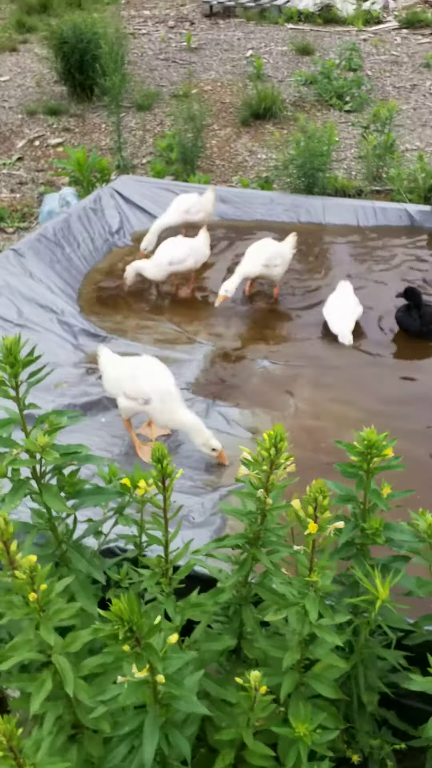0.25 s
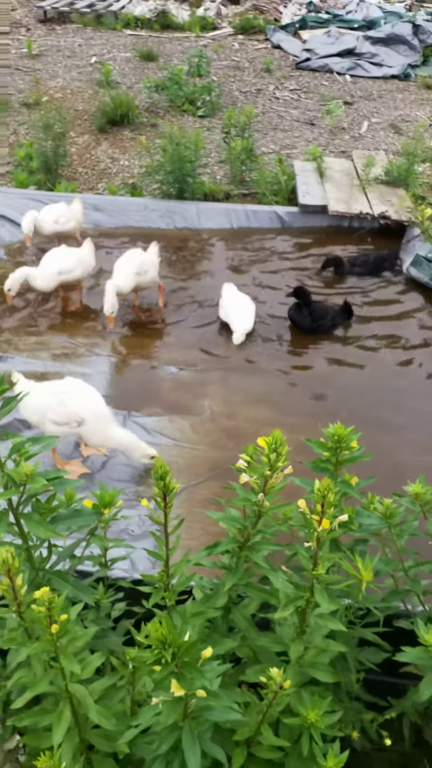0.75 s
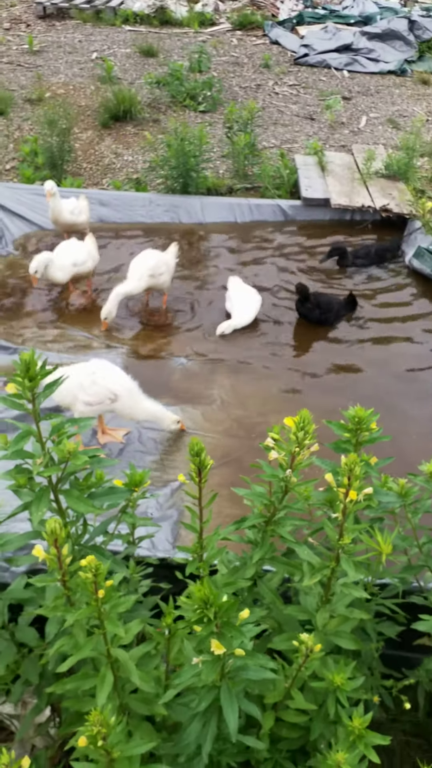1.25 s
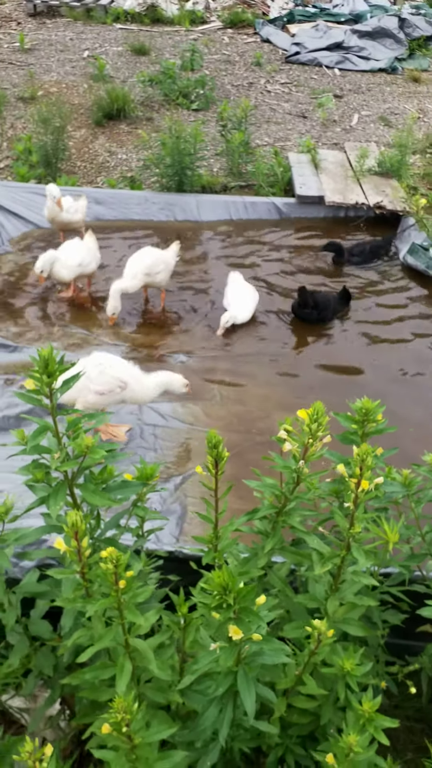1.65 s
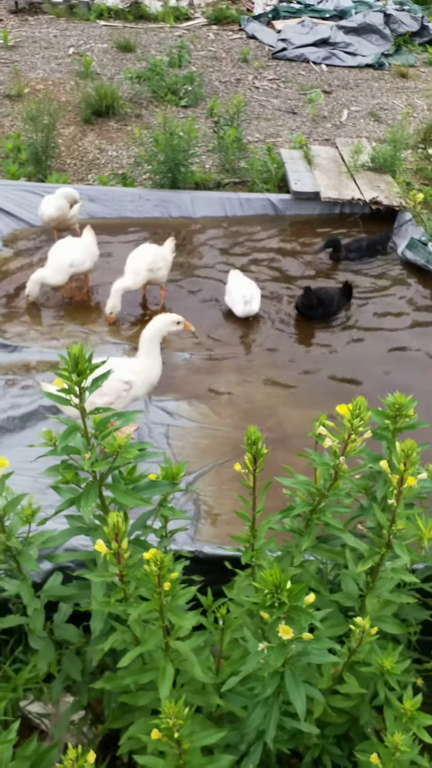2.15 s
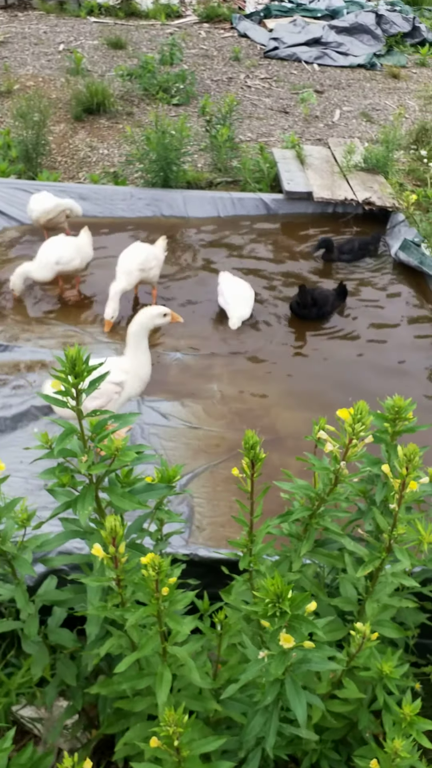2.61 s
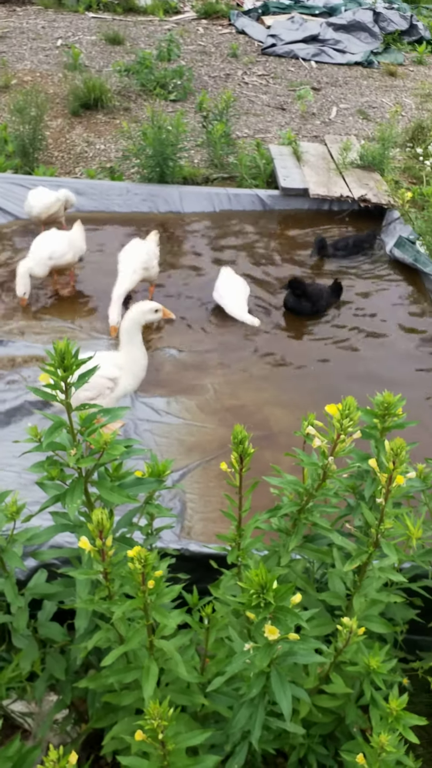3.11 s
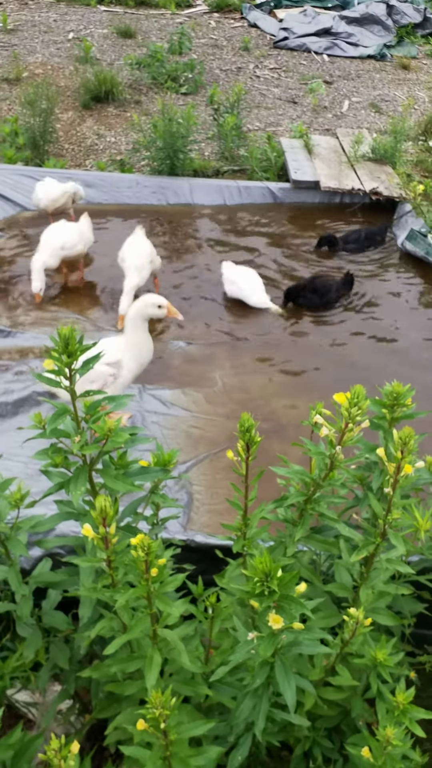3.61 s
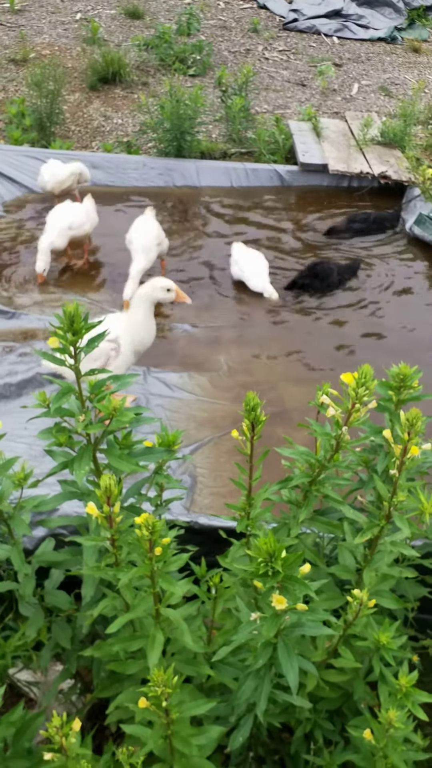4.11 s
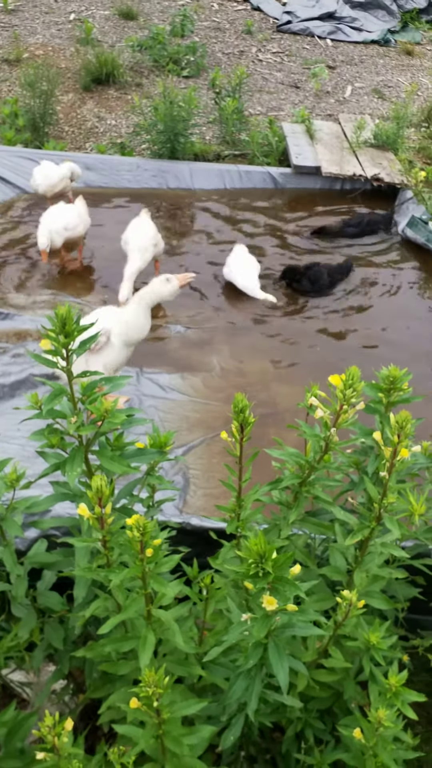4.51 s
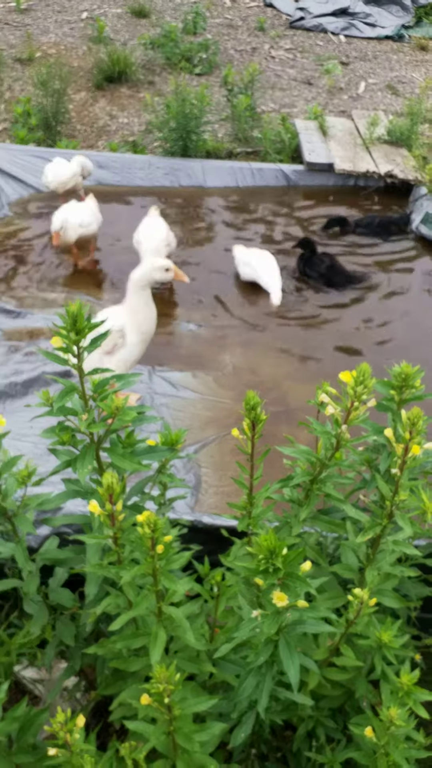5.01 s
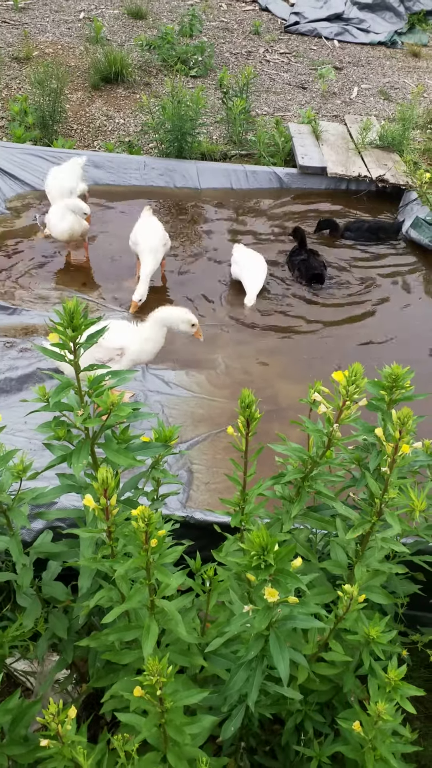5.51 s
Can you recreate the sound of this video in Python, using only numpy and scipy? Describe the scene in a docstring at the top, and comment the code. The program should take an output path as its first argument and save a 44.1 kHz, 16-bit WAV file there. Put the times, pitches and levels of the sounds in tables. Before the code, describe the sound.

One loud, cracking four-part rooster crow echoes outdoors over ticking bills, small plops and sloshes, thin peeps and brief bird whistles.

```python
"""Cockerel by a gosling pool

A cockerel crows in a yard: harmonics in a high register, hoarse low croaks between, a far wall's return.
Goslings peep in near-sine arches and a duck throat grunts in rough pulses beside a shallow pool. Bills tick,
plop and slosh as damped bubbles and noise bursts; a small bird whistles in gliding tones. Shaped noise makes
trickle, a high hiss and air, and a light wind bumps the two microphone ports."""
import sys
import numpy as np
from scipy import signal
from scipy.fft import rfft, irfft
from scipy.io import wavfile
from scipy.ndimage import uniform_filter1d

SR = 44100
rng = np.random.default_rng(int(sys.argv[2]) if len(sys.argv) > 2 else 0)


def store_pcm(level_fs):
    """Save levels as 16-bit WAV."""
    pcm = np.round(np.clip(level_fs, -1, 1) * 32767).astype(np.int16)
    wavfile.write(sys.argv[1], SR, np.atleast_2d(pcm).T)


N = 253575

# tilt between the two microphone ports: (frequency_hz, left_over_right_db)
PORT_TILT = [(60, 0), (180, -2), (550, -3.5), (1650, 4), (4970, 8), (15000, 2)]
# activity of the water, shared by trickle and droplets: (time_s, relative_level_db)
WATER_LEVEL = [(0, -59), (1.0, -61), (1.3, -63.5), (1.6, -57), (2.25, -59), (2.4, -69), (3.0, -62),
               (3.6, -66), (4.2, -67), (5.75, -67.5)]


def gain_of(db):
    """Decibels to gain."""
    return 10 ** (np.asarray(db) / 20)


def evened(x):
    """Scales to rms 1."""
    return x / np.sqrt(np.mean(x ** 2) + 1e-20)


def read(points, hz):
    """Reads a spectrum table on a log-frequency axis."""
    f, value = np.transpose(points)
    return np.interp(np.log(hz + 1), np.log(f + 1), value)


def along(curve):
    """A two-column curve at every sample."""
    return np.interp(np.arange(N) / SR, *np.transpose(curve))


def unroll(rows):
    """Sample times and every column of a curve table."""
    s, *columns = np.transpose(rows)
    t = np.arange(s[0], s[-1], 1 / SR)
    return [t] + [np.interp(t, s, c) for c in columns]


def add(mix, s, sound):
    """Mixes a sound in at a time."""
    part = mix[..., round(s * SR):][..., :sound.shape[-1]]
    part += sound[..., :part.shape[-1]]


def wobble(n, size):
    """Smooth random curve of rms 1; size is the smoothing in points."""
    return evened(uniform_filter1d(uniform_filter1d(rng.standard_normal(n), size), size))


def phase_of(hz):
    """Running phase of a pitch curve."""
    return 2 * np.pi * np.cumsum(hz) / SR


def band(x, hz, spread):
    """Band-pass around a centre; spread is the ratio of each edge to it."""
    return signal.sosfilt(signal.butter(2, [hz / spread, hz * spread], "band", fs=SR, output="sos"), x)


def pan(db):
    """Left and right gains for a level difference."""
    return gain_of([[db / 2], [-db / 2]])


def ports(x):
    """One source at two ports: a phase lead on the left and a tilt by frequency."""
    # (frequency_hz, left_lead_radians)
    port_lead = [(300, 0.067), (700, 0.44), (1420, 1.21), (2800, 0.86), (5000, 0.78)]
    hz = np.fft.rfftfreq(len(x), 1 / SR)
    half = gain_of(read(PORT_TILT, hz) / 2) * np.exp(.5j * read(port_lead, hz))
    return irfft(rfft(x) * np.array([half, 1 / half]), len(x))


def echoes(x, start_s, t60):
    """Sparse taps of random sign dying away, other taps for each port."""
    t = np.arange(SR) / SR
    signs = rng.choice([-1., 1.], (2, SR))
    sparse = rng.random((2, SR)) < .045
    taps = signs * sparse * (t > start_s) * gain_of(-60 * t / t60)
    return signal.fftconvolve(x[None], taps / np.linalg.norm(taps[0]), axes=1)[:, :N]


def bubble(hz, t60, rise):
    """A damped tone that climbs, as a bubble does near the surface; a negative rise makes it sink."""
    t = np.arange(0, t60, 1 / SR)
    tone = np.sin(2 * np.pi * hz * (t + rise * t ** 2 / t60))
    return tone * gain_of(-60 * t / t60) * np.minimum(t / 0.0005, 1)


def hiss(shape, level_db, flicker_db, alike):
    """Random short-time spectra with drifting patches and a flicker common to all bins."""
    # likeness of the two ports before scaling by alike: (frequency_hz, likeness_ratio)
    port_likeness = [(60, 0.82), (240, 1), (950, 0.88), (3770, 0), (15000, 0.36)]
    patchy_db = 2.2
    frames, hz = N // 128 + 5, np.fft.rfftfreq(512, 1 / SR)
    a, b, c, d, patches = rng.standard_normal((frames, 257, 5)).T
    patches = evened(uniform_filter1d(uniform_filter1d(patches, 5, 0), 14, 1))
    same = np.clip(alike * read(port_likeness, hz), -1, 1)[:, None]
    left, other = a + 1j * b, c + 1j * d
    z = np.array([left, same * left + np.sqrt(1 - same ** 2) * other])
    z *= gain_of(read(shape, hz)[:, None] + patchy_db * patches + flicker_db * wobble(frames, size=3))
    z *= gain_of(np.multiply.outer([.5, -.5], read(PORT_TILT, hz)))[:, :, None]
    out = signal.istft(z, nperseg=512, noverlap=384)[1][:, :N]
    # the level is that of the mean of both ports
    return gain_of(level_db) * out / np.sqrt(np.mean(out.mean(0) ** 2))


def air():
    """Steady background noise of the open yard."""
    # (frequency_hz, relative_density_db_per_hz)
    air_shape = [(18, -3), (36, 26.5), (106, 3), (458, -1.5), (678, 0), (1530, -38), (6630, -6.5),
                 (7750, -32), (8390, -38), (10600, -25.5), (15700, -26.5)]
    return hiss(air_shape, level_db=-61, flicker_db=1.0, alike=0.76)


def high_hiss():
    """High hiss that comes and goes, nearly unrelated at the two ports."""
    # (frequency_hz, relative_density_db_per_hz)
    high_shape = [(4120, -60), (7000, -5), (8240, -16.5), (8750, -17), (11000, -15), (12200, -11.5),
                  (13600, -24), (15700, -37)]
    # (time_s, level_db)
    high_level = [(0, -57), (.3, -61), (.36, -65), (.9, -63.5), (1.4, -61), (1.45, -73.5), (1.65, -69),
                  (1.7, -65.5), (2.25, -63.5), (2.32, -78), (2.84, -83), (2.87, -56.5), (3.08, -62),
                  (3.15, -74), (5.75, -79.5)]
    return hiss(high_shape, along(high_level), flicker_db=1.6, alike=0.16)


def trickle():
    """Flickering noise of trickling water that follows the activity of the water."""
    # (frequency_hz, relative_density_db_per_hz)
    trickle_shape = [(710, -2.5), (1200, 0.5), (6530, 1.5), (7800, -8.5), (8340, -51), (9000, -47),
                     (11700, -47), (19800, -120)]
    return hiss(trickle_shape, along(WATER_LEVEL) + 7, flicker_db=2.8, alike=0.65)


def wind():
    """Lumpy low noise, unrelated at the two ports, with single bumps as damped low tones."""
    # (frequency_hz, relative_density_db_per_hz)
    wind_shape = [(12, -35), (28, -13), (70, -1.5), (200, -19), (292, -23.5), (325, -28), (500, -44),
                  (650, -44), (1100, -120)]
    # (time_s, relative_level_db)
    gust_level = [(0, -88), (.3, -61.5), (1.8, -88), (1.92, -47.5), (2.25, -47.5), (2.5, -59.5),
                  (2.8, -101), (3.25, -62.5), (3.6, -71), (3.72, -45), (3.95, -53.5), (4.25, -49.5),
                  (4.45, -56), (4.9, -54.5), (5.1, -63.5), (5.75, -65)]
    # bumps on the ports: (start_s, nominal_peak_db, pitch_hz)
    bumps = [(0.111, -32, 122), (0.143, -31, 111), (0.178, -31, 230), (1.731, -39, 162), (2.238, -33, 72),
             (3.697, -34.5, 97.5), (3.724, -32, 111), (4.233, -35.5, 83), (4.363, -33.5, 100),
             (4.723, -26.5, 179.6)]
    hz = np.fft.rfftfreq(N, 1 / SR)
    low = irfft(rfft(rng.standard_normal((2, N))) * gain_of(read(wind_shape, hz)), N)
    lumpy = evened(low * gain_of(5.67 * wobble(N, size=1200)))
    out = lumpy * gain_of(along(gust_level) + 1.0) * pan(-9.5)
    for s, peak_db, hz in bumps:
        # half a period of smoothing softens the start
        soften = np.hanning(round(SR / hz / 2)) * 4 * hz / SR
        bump = signal.lfilter(soften, 1, bubble(hz, 9.7 / hz, -0.018))
        add(out, s, gain_of(peak_db) * pan(-2.0) * bump)
    return out


def bird():
    """Small bird: gliding whistles that ring on among the trees."""
    # whistles and two endings for the slide: (time_at_pace_1_s, pitch_hz, relative_level_db)
    SLIDE = [(0, 4960, -39), (0.081, 2835, -48)]
    CLIMB = [(0, 2950, -61.5), (.05, 4196, -43.5), (.066, 4800, -53.5), (.074, 5540, -52),
             (.108, 5555, -50), (.116, 5000, -51.5), (.135, 4140, -44)]
    LOOP = [(0, 2756, -52), (.02, 3750, -54), (0.036, 4250, -57), (.06, 3600, -55), (.08, 3450, -47),
            (.11, 2320, -62), (.155, 2566, -59)]
    DIP = [(0, 3030, -43.5), (0.059, 2204, -57), (0.086, 3216, -52), (.12, 3218, -46.5),
           (0.164, 2865, -47.5)]
    HOOK_UP = [(.125, 3480, -44)]
    HOOK_DOWN = [(0.093, 2640, -46)]
    # (start_s, whistle, pace_ratio, relative_level_db)
    song = [(1.569, SLIDE + HOOK_UP, 1.15, -3.5), (1.724, SLIDE + HOOK_DOWN, 1.08, -3),
            (2.854, CLIMB, 1.04, 1), (3.027, CLIMB, 1, 4), (3.997, LOOP, 1.01, 0.8),
            (4.213, DIP, 1.03, -2.6)]
    out = np.zeros(N)
    for start, whistle, pace, gain_db in song:
        t, hz, level_db = unroll(np.array(whistle) / [pace, 1, 1])
        tone = np.sin(phase_of(uniform_filter1d(hz, size=400))) * (1 + 0.45 * wobble(len(t), size=110))
        tone *= signal.windows.tukey(len(t), .15)
        add(out, start, np.sqrt(2) * gain_of(level_db + gain_db) * tone)
    return gain_of(-2.5) * ports(out) + gain_of(-2) * echoes(out, 0.0037, 0.66)


def plops():
    """Bubbles and plops in the pool: a damped tone with a splat of noise."""
    # (start_s, nominal_peak_db, pitch_hz, left_over_right_db)
    plop_rows = [(0.022, -27, 2900, -6.5), (0.172, -27.5, 2900, -4), (0.247, -30.5, 2280, -3),
                 (0.328, -25, 2670, 3), (2.741, -41.5, 606, -8), (2.741, -40.5, 1470, -17),
                 (2.857, -42, 590, 0), (3.364, -36, 806, 8), (4.93, -37.5, 1970, 8), (3.185, -33, 1290, 6),
                 (3.207, -24, 1238, 6), (3.693, -33, 3100, 5), (5.012, -37.5, 1260, 3),
                 (5.476, -34.5, 815, 2)]
    out, t = np.zeros((2, N)), np.arange(900) / SR
    for s, peak_db, hz, side_db in plop_rows:
        splat = evened(band(rng.standard_normal(900), 1020, 2.6)) * gain_of(-60 * t / 0.088)
        add(out, s, gain_of(peak_db) * pan(side_db) * bubble(hz, 0.0058 + 25 / hz, 0.012))
        add(out, s, gain_of(peak_db - 15.5) * pan(side_db) * splat)
    return out


def ticks():
    """Bills and droplets ticking: noise bursts of a few milliseconds in a band."""
    # (start_s, nominal_peak_db, centre_hz)
    tick_rows = [(0.1522, -30, 3150), (0.3034, -34.5, 4440), (0.9963, -28, 3700), (1.026, -26, 3850),
                 (1.3914, -27, 5700), (1.4534, -30, 5560), (1.5778, -23, 4750), (1.6991, -28, 4360),
                 (1.723, -28, 5140), (2.1965, -30.5, 5230), (2.357, -35.5, 5300), (2.4179, -36.5, 4270),
                 (2.564, -41, 6400), (2.8567, -37, 6420), (2.8956, -31, 4530), (3.157, -29.5, 5560),
                 (3.207, -24, 5400), (3.511, -41, 2000), (3.7363, -33.5, 5000), (3.8838, -32.5, 6250),
                 (4.085, -42, 5940), (4.141, -43, 5400), (4.211, -38, 5000), (4.3587, -32.5, 6700),
                 (4.389, -42, 6240), (5.163, -33.5, 680), (5.2352, -29.5, 4600), (5.305, -37, 4800),
                 (5.311, -35.5, 1680), (5.368, -35, 1210), (5.445, -42, 4100), (5.494, -34, 1280)]
    # high ticks are narrower: (centre_hz, band_edge_ratio)
    tick_spread = [(1500, 1.7), (4500, 1.4), (6000, 1.1)]
    out, t = np.zeros((2, N)), np.arange(900) / SR
    for s, peak_db, hz in tick_rows:
        burst = rng.standard_normal(900) * gain_of(-60 * t / .005)
        crack = band(burst, hz, read(tick_spread, hz))
        crack = crack / abs(crack).max() * [[1], [.9]]
        add(out, s, gain_of(peak_db) * pan(read(PORT_TILT, hz)) * crack)
    return out


def sloshes():
    """Water sloshing: lumpy band noise full of small rising bubbles."""
    # (middle_s, half_length_s, level_db, centre_hz)
    slosh_rows = [(.06, 0.063, -44, 776), (0.166, 0.065, -46.5, 335), (2.871, 0.037, -62, 573),
                  (3.304, 0.014, -48.5, 665), (3.457, 0.099, -49, 840), (3.767, 0.072, -56, 860),
                  (3.905, 0.03, -50, 797), (5.167, 0.042, -46, 740), (5.274, 0.041, -53, 830),
                  (5.488, 0.021, -50.5, 780), (5.577, 0.035, -52.5, 720), (5.724, 0.026, -46.5, 890)]
    out = np.zeros((2, N))
    for s, half, level_db, hz in slosh_rows:
        n = round(4 * half * SR)
        churn = band(rng.standard_normal((2, n)) * [[1], [.6]], hz, 1.58)
        churn *= gain_of(1.08 * wobble(n, size=220))
        for share in (.7, .9, 1.15, 1.5):
            # about 90 bubbles a second at each pitch
            strikes = rng.exponential(.3, n) * (rng.random(n) < 90 / SR)
            churn += signal.oaconvolve(strikes, bubble(hz * share, 14 / hz, .2))[:n]
        slosh = evened(churn + 0.17 * churn[0]) * np.hanning(n)
        add(out, max(s - 2 * half, 0), gain_of(level_db) * slosh)
    return out


def droplets():
    """A random patter of tiny bubbles over twelve pitches."""
    out = np.zeros((2, N))
    for hz in np.geomspace(3000, 6900, num=12):
        size_db = along(WATER_LEVEL) + 19 + 4. * np.minimum(rng.exponential(1, N), 4)
        # small droplets fall more often
        falls = rng.random(N) < 1.6 / SR * hz / 1000
        patter = signal.oaconvolve(gain_of(size_db) * falls, bubble(hz, 5.5 / hz, 0.36))[:N]
        out += patter * pan(read(PORT_TILT, hz) + rng.uniform(-9, 5))
    return out


def snaps():
    """Droplets bursting in the high treble as short noise bursts."""
    # (start_s, nominal_peak_db), held to -49 dB at most
    snap_rows = [(1.503, -51), (1.6259, -47), (2.128, -39), (2.5635, -45), (2.6277, -59), (2.8571, -58),
                 (3.7465, -55.5), (5.236, -48)]
    out, t = np.zeros((2, N)), np.arange(900) / SR
    for s, peak_db in snap_rows:
        snap = band(rng.standard_normal(900) * gain_of(-60 * t / .014), 10500, 1.3)
        add(out, s, gain_of(min(peak_db, -49)) * pan(4) * snap / abs(snap).max())
    return out


def dabbling():
    """Bills and water in the pool: all but the snaps are dulled above 7400 Hz."""
    dull = signal.ellip(6, 1, 40, 7400, fs=SR, output="sos")
    return signal.sosfilt(dull, plops() + ticks() + sloshes() + droplets()) + snaps()


def grunts():
    """Short duck grunts: a few rough pulses through the resonances of the throat."""
    # (start_s, level_db, pitch_hz, length_s)
    grunt_rows = [(0.675, -43, 289.6, 0.022), (0.841, -41.5, 290, 0.042), (3.047, -47, 303, 0.038),
                  (4.594, -37.5, 331.3, 0.063), (5.069, -46, 300, 0.042)]
    # throat resonances: (centre_hz, width_hz, gain_db)
    resonances = [(320, 330, 12.5), (684, 85, 12), (1000, 310, 13.5), (2030, 62, 16.5)]
    out = np.zeros(N)
    k = np.arange(1, 19)[:, None]  # harmonic numbers
    for s, level_db, hz, length in grunt_rows:
        t = np.arange(0, length, 1 / SR)
        turn = phase_of(hz * (1 + 0.14 * wobble(len(t), size=60)))
        throat = sum(gain_of(db) / (1 + (2 * (k * hz - f) / width) ** 2) for f, width, db in resonances)
        pulses = evened((throat * np.cos(k * turn)).sum(0))
        breath = evened(band(rng.standard_normal(len(t)), 900, 2.6))
        add(out, s, gain_of(level_db) * (pulses + 0.45 * breath) * np.hanning(len(t)) ** 2)
    return ports(out)


def goslings():
    """Near-sine peeps whose pitch falls away on both sides of a top, through a throat resonance."""
    # (start_s, top_s, end_s, top_hz, hz_lower_30_ms_before_top, nominal_level_db)
    peeps = [(.1, .132, .142, 2400, 410, -40), (.2, .225, .24, 1900, 230, -47),
             (.51, .568, .59, 2040, 290, -41), (.59, .592, .612, 1900, 800, -47),
             (.53, .555, .595, 3060, 160, -48), (.735, .766, .778, 2040, 480, -41),
             (.772, .797, .8, 2950, 1160, -39), (.845, .85, .895, 1850, 200, -48),
             (.902, .908, .916, 2050, 3500, -33), (1.345, 1.372, 1.39, 2150, 600, -54),
             (1.855, 1.885, 1.92, 1760, 200, -54), (2.63, 2.672, 2.688, 1785, 270, -52),
             (2.76, 2.806, 2.83, 2300, 500, -58), (2.93, 2.97, 3.0, 2060, 450, -56),
             (3.155, 3.19, 3.193, 830, 210, -50), (3.205, 3.225, 3.245, 2250, 700, -44),
             (3.305, 3.335, 3.358, 3080, 1250, -43), (3.362, 3.44, 3.47, 2260, 350, -46),
             (3.535, 3.58, 3.615, 2280, 460, -50), (4.88, 4.905, 4.92, 2500, 1100, -58),
             (4.92, 4.922, 4.948, 2300, 900, -47), (4.942, 4.972, 4.98, 2400, 800, -57),
             (5.335, 5.385, 5.41, 2350, 520, -47), (5.468, 5.497, 5.53, 2650, 900, -49),
             (5.545, 5.562, 5.592, 950, 200, -56)]
    fall_pace, arch_power = 1.2, 1.55  # a peep falls faster than it rises
    throat_hz, throat_width_hz = 1870, 570  # loudest where the pitch crosses this resonance
    out = np.zeros(N)
    for start, top, end, top_hz, bend_hz, level_db in peeps:
        t = np.arange(start, end, 1 / SR)
        from_top = np.maximum(top - t, fall_pace * (t - top))
        hz = top_hz - bend_hz * (from_top / .03) ** arch_power
        tone = np.sin(phase_of(hz)) * (1 + 0.4 * wobble(len(t), size=110))
        throat = 1 / np.hypot(1, (hz - throat_hz) / throat_width_hz)
        # the swell is loudest on the way up: 0 at the start, 1 at the top, 2 at the end
        progress = np.interp(t, [start, top, end], [0, 1, 2])
        swell = gain_of(3 - 18 * np.minimum(abs(progress - .58), .65))
        peep = tone * throat / throat.max() * swell * signal.windows.tukey(len(t), .3)
        add(out, start, np.sqrt(2) * gain_of(level_db) * peep)
    return ports(out) + gain_of(-6.5) * echoes(out, 0.0086, 0.5)


def broken(t):
    """How far the high voice cuts out, 0 to 1, as it flips between registers."""
    # (middle_s, half_length_s)
    voice_breaks = [(0.885, 0.0022), (0.907, 0.0034), (0.934, 0.0038), (0.965, 0.0051), (1.003, 0.018),
                    (1.036, 0.0043)]
    return np.minimum(sum(np.exp(-((t - s) / half) ** 2) for s, half in voice_breaks), 1)


def croaks():
    """Hoarse low register between syllables: five unsteady harmonics, louder in the breaks."""
    # (start_s, length_s, pitch_hz, drift_hz_per_s, harmonic_1_db, harmonic_2_db, swell_db), nominal levels
    croak_rows = [(0.231, 0.17, 472, 147, -62.5, -58, 8.5), (0.447, 0.066, 582, -700, -45.5, -37.5, -7),
                  (.69, 0.11, 538, 223, -55.5, -46.5, 4), (0.889, .34, 559.5, -50.5, -59, -49.5, 8.5),
                  (2.257, 0.05, 636, -1200, -42, -63, -12)]
    out = np.zeros(N)
    for start, length, pitch_hz, drift, first_db, second_db, swell_db in croak_rows:
        since = np.arange(0, length, 1 / SR)
        n = len(since)
        turn = phase_of((pitch_hz + drift * since) * (1 + 0.032 * wobble(n, size=90)))
        levels = [first_db, second_db] + [second_db - 11] * 3
        voice = sum(gain_of(db) * (1 + 0.5 * wobble(n, size=50)) * np.sin((k + 1) * turn)
                    for k, db in enumerate(levels))
        voice *= gain_of(swell_db * since / length) * (1 + 1.03 * broken(start + since))
        add(out, start, np.sqrt(2) * voice * signal.windows.tukey(n, 900 / n))
    return out


def crow():
    """High register: seven harmonics on a pitch that scoops up, sags with the breath and drops."""
    # (start_s, length_s, pitch_hz, drift_hz_per_s, harmonic_1_db, its_fade_db, harmonic_2_db,
    #  its_fade_db, top_harmonics_over_beak_peak_db), nominal levels
    syllables = [(0.346, 0.11, 794, -140, -38, 3.5, -32.5, -2, -30),
                 (0.609, 0.09, 774.5, -16, -35, 6.5, -32.5, 0.5, -13),
                 (0.78, .29, 747, -60, -29.5, -3, -31, -12, -12),
                 (1.206, 1.067, 707.3, 20, -34.5, -8.5, -36, 2.5, -4.5)]
    # opening of the beak, lifting the harmonics from the 3rd up: (time_s, relative_level_db)
    beak_opening = [(.35, -47.5), (.47, -56), (.62, -47), (.7, -40.5), (.8, -41.5), (.9, -49), (1.07, -45),
                    (1.23, -48), (1.34, -48), (1.55, -56.5), (1.8, -60.5), (2.06, -100), (2.15, -58.5),
                    (2.24, -53), (2.3, -43)]
    scoop_share, scoop_s = .24, .0065  # slide up to the pitch: share of the pitch, time constant
    sag_hz, sag_s = 55.64, .2  # slow sag toward the end of the breath
    drop_hz, drop_s, drop_db = 66.7, 0.0163, -11  # last drop of pitch and level
    shine_share, shine_fade_db_per_s = .6, 13  # how far the top harmonics follow the beak, and their fade
    swell_db, swell_s = -5, 0.02  # the voice starts softer and swells
    attack_s, shine_s = 0.0041, 0.026  # rise of the voice and of its top harmonics
    out = np.zeros(N)
    for start, length, pitch_hz, drift, first_db, first_fade, second_db, second_fade, shine_db in syllables:
        since = np.arange(0, length, 1 / SR)
        t, left, n = start + since, length - since, len(since)
        drop = np.exp(-left / drop_s)
        hz = pitch_hz * (1 - scoop_share * np.exp(-since / scoop_s)) + drift * since
        hz -= sag_hz * np.exp(-left / sag_s)
        hz -= drop_hz * drop * min(length / 0.75, 1)  # short syllables hardly drop in pitch
        beak = np.interp(t, *np.transpose(beak_opening))
        first = first_db + first_fade * since / length + drop_db * drop
        second = second_db + second_fade * since / length + drop_db * drop
        middle = beak + drop_db * drop
        shine = shine_db + beak.max() + shine_share * (beak - beak.max()) + drop_db * drop
        shine -= 20 * np.exp(-since / shine_s) + shine_fade_db_per_s * since
        # hoarse at the start, around breaks and as the pitch sags
        rough = 0.049 + 0.12 * np.exp(-since / 0.076)
        rough += 0.12 * uniform_filter1d(broken(t), size=3000) + np.clip((690 - hz) / 110, 0, 1)
        turn = phase_of(hz * (1 + 0.089 * rough * wobble(n, size=120)))
        # the weak harmonics follow their strong neighbours
        levels = [first, second, middle - 4, middle + 6, shine - 15, shine - 9, shine + 3]
        voice = sum(gain_of(db) * np.sin((k + 1) * turn + k) * (1 + rough * wobble(n, size=30))
                    for k, db in enumerate(levels))
        voice *= (1 - broken(t)) * np.minimum(since / attack_s, 1)
        voice *= gain_of(swell_db * np.exp(-since / swell_s))
        add(out, start, np.sqrt(2) * voice * signal.windows.tukey(n, 900 / n))
    return out


def cockerel():
    """Both registers of the cockerel, echoes in the yard and a band-limited return from a far wall."""
    voice = crow() + croaks()
    far_wall = gain_of(-25.5) * np.roll(voice, round(.39 * SR))
    far_wall = signal.sosfilt(signal.butter(2, [1000, 1900], "band", fs=SR, output="sos"), far_wall)
    out = ports(voice + far_wall)
    out += gain_of(-9.5) * echoes(band(voice, 2290, 2.75), 0.021, 1.0)
    out += gain_of(-12) * echoes(voice, 0.012, 0.22)
    return out + gain_of(3.0) * echoes(far_wall, 0.02, 2.1)


def scene():
    """All sources together, from the background to the cockerel."""
    background = air() + high_hiss() + trickle() + wind()
    return background + bird() + dabbling() + grunts() + goslings() + cockerel()


def record(dry):
    """The band limit of the recorder: a steep low-pass."""
    edge_hz = 15780
    low_pass = signal.firwin(511, edge_hz, window=("kaiser", 9), fs=SR)
    return signal.oaconvolve(dry, low_pass[None], "same")


dry = scene()
out = record(dry)
store_pcm(out)
```